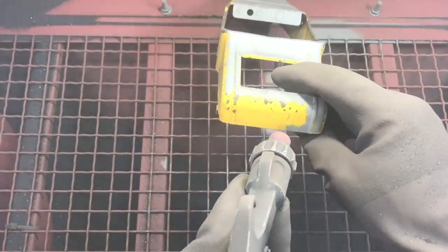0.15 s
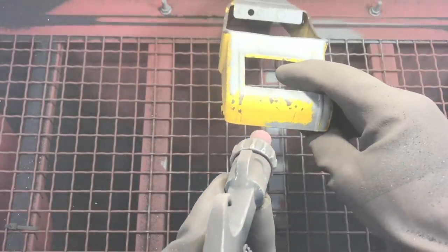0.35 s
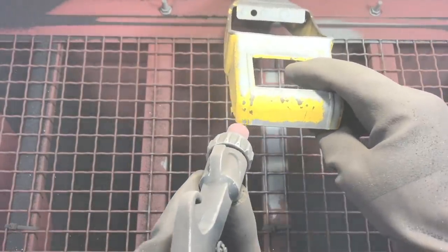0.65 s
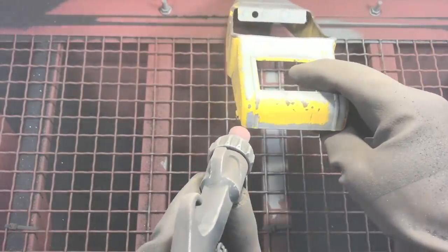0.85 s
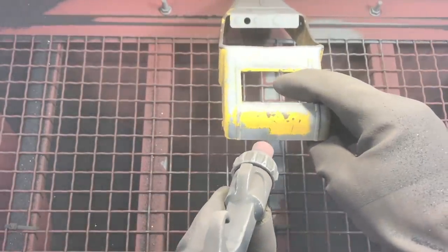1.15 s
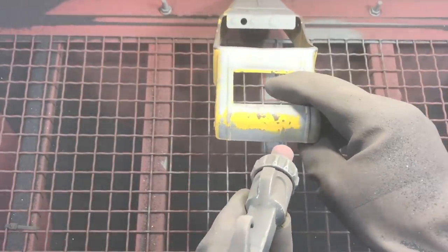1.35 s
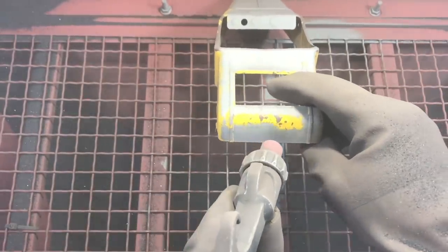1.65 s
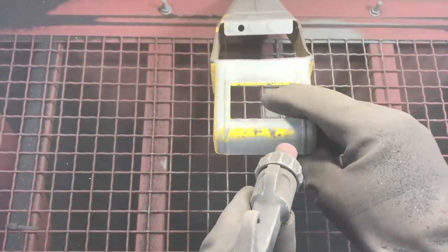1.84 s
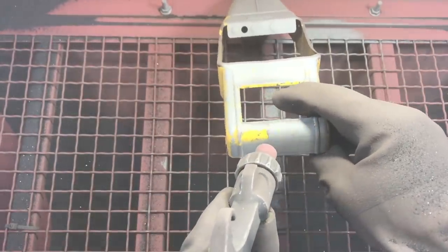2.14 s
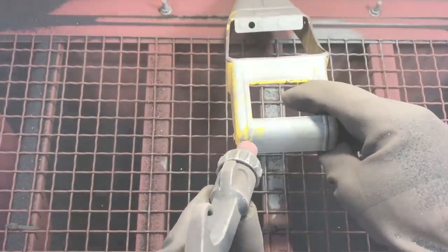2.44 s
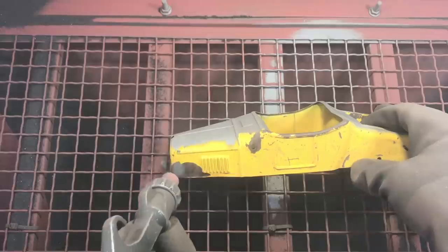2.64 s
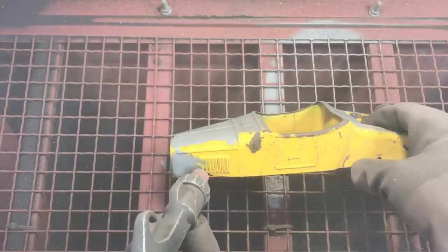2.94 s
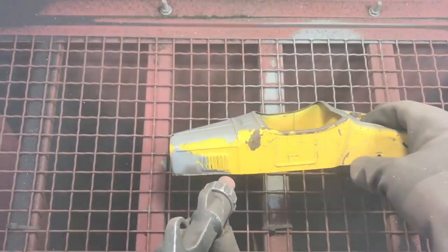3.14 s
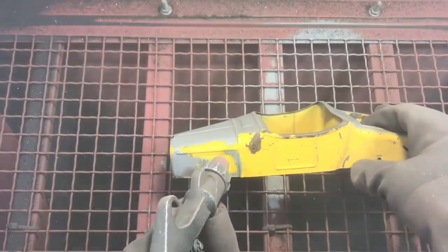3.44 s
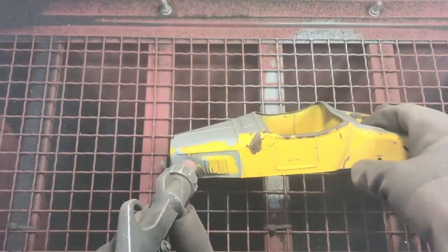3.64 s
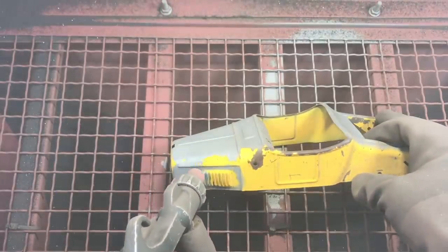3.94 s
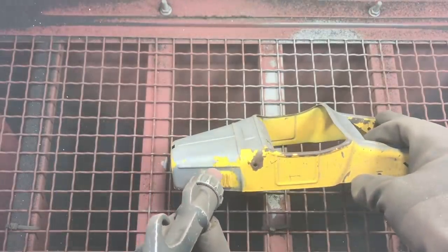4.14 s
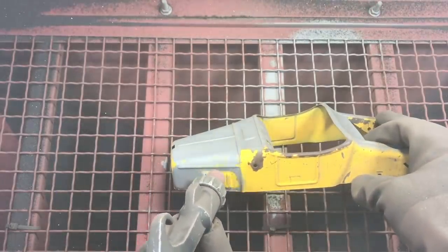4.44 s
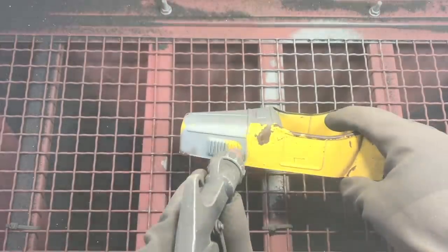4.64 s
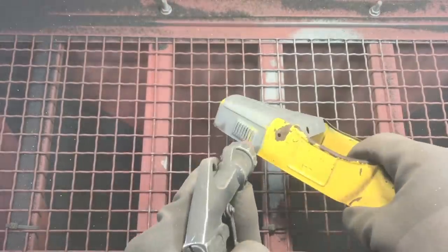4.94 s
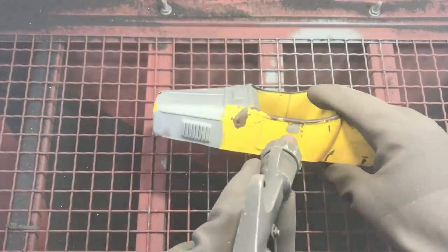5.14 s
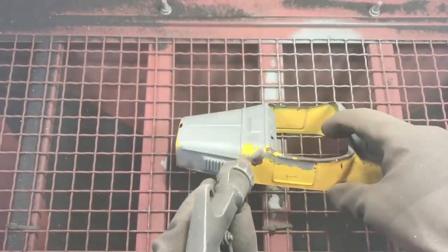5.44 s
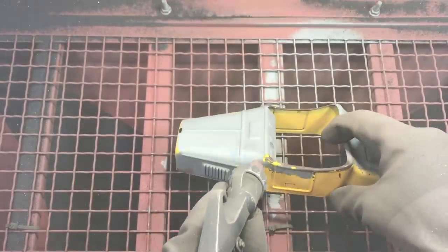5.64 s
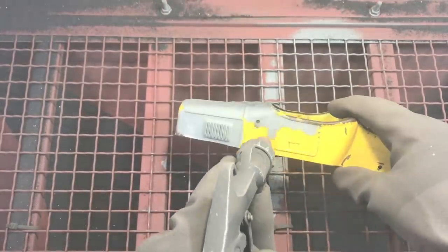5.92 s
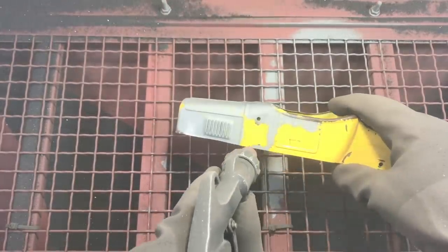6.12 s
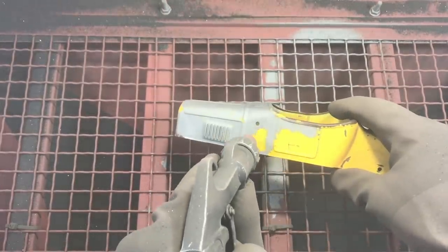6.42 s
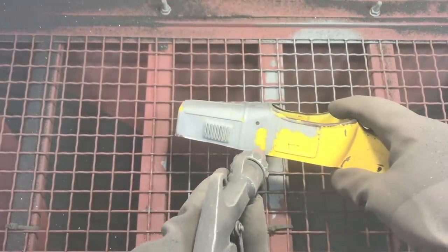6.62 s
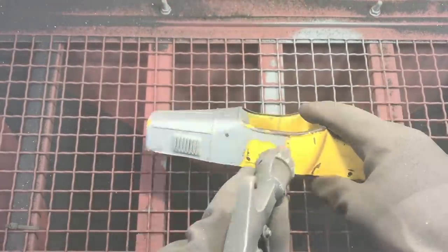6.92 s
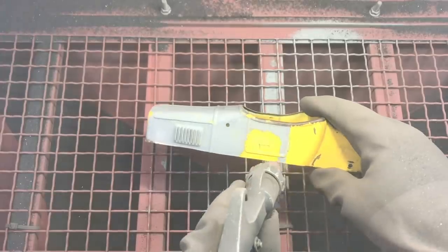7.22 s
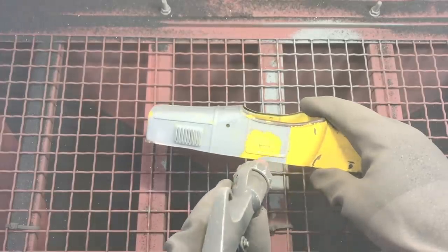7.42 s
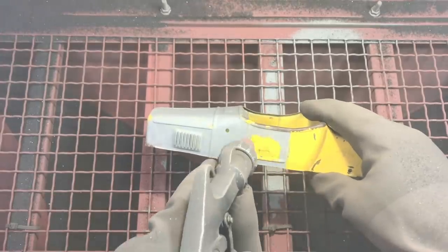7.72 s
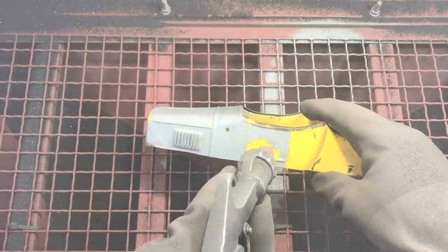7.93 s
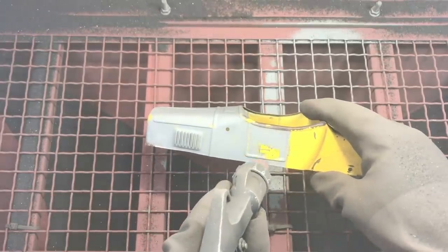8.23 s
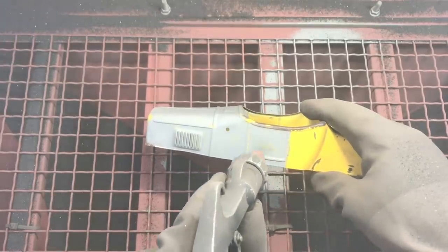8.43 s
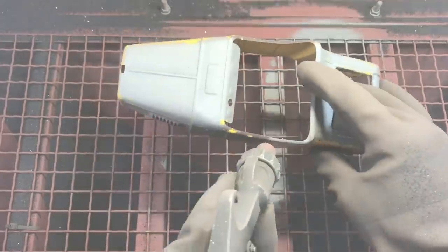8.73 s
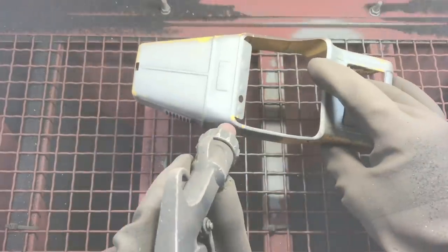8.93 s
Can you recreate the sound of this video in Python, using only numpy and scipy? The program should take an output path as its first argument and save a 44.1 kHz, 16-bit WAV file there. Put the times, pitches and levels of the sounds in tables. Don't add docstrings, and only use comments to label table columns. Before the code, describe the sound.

A blast gun hisses for the whole nine seconds: dense, bright, slightly grainy air noise, strongest in the treble, with a narrower mid-range wash where the jet breaks on thin metal. A faint unsteady whistle near 6.3 kHz is clearest in the first 2.5 seconds, weaker afterwards. Behind it an extractor motor sings quietly in clean, steady harmonics, its pitch dropping very slightly at 4.5. Tiny knocks at 2.15 lead to a sliding scrape at 2.47 and a loud, sharp, bright clack at 2.54-2.58 as one part is dropped. Hiss alone follows until a knock at 4.5, then a rapid cluster of hollow knocks from 4.77 to 5.04, lighter ones at 5.35, a rubbing knock at 5.77 and a firm one at 6.89. Light ticks and rubs come at 8.5-8.7, with a soft low puff at 8.6, and faint touches near 9. Close microphone, small steel box, no deep bass.

```python
import sys
import numpy as np
from scipy import signal
from scipy.fft import rfft, irfft, next_fast_len
from scipy.io import wavfile

SR = 44100
rng = np.random.default_rng(int(sys.argv[2]) if len(sys.argv) > 2 else 0)


def natural_amplitude(level_db):
    exponent = np.asarray(level_db, float) / 20
    return 10 ** exponent


def waveform_to_disk(signal):
    frames = np.transpose(np.atleast_2d(signal))
    scaled = np.clip(frames, -1, 1) * 32767
    samples = np.round(scaled).astype(np.int16)
    wavfile.write(sys.argv[1], SR, samples)


N = 399987

# time in seconds, wash level in dB.
JET_ON_PART = [(0.0, -52.5), (0.48, -51), (0.86, -52), (1.92, -52.5), (2.35, -48.5), (2.85, -52),
               (3.46, -51.5), (4.75, -51), (4.92, -49.5), (8.03, -52), (9.07, -49.5)]
# frequency in Hz, density in dB per Hz.
HISS_SPECTRUM = [(1200, -14.5), (1900, -16), (2300, -13), (3100, -11), (3500, -3), (4500, -4), (5500, -5.5),
                 (7000, -6.5), (8800, -8.5), (9800, -5), (11400, -4.5), (12200, -8.5), (13600, -4.5),
                 (16500, -12)]
# frequency in Hz, density in dB per Hz.
WASH_SPECTRUM = [(400, -24.5), (600, -12.5), (720, -7), (820, 4.5), (950, 5.5), (1200, 3), (1500, -1.5),
                 (2000, -2.5), (2600, -7)]
# frequency in Hz, density in dB per Hz.
RUMBLE_SPECTRUM = [(20, 0.5), (100, 2), (250, 2), (420, 0.5), (600, -1), (900, 0.5)]
# centre in Hz, width in Hz, gain in dB.
CAVITY = [(3650, 200, 3), (3870, 60, -3), (4320, 110, 5), (4850, 120, -7), (6270, 280, 8), (6600, 150, -3),
          (7450, 100, -4), (8400, 80, -3), (2230, 150, -3), (5900, 150, -3), (10140, 150, 8),
          (10300, 120, 9), (10490, 130, -6), (11020, 160, 5), (11290, 90, 3), (11700, 150, -3),
          (13520, 120, 3), (14080, 170, 9), (14560, 100, 3), (15560, 130, 6)]
# delay in seconds, level in dB.
WALL_ECHOES = [(.0021, -21), (.0047, -19), (.0083, -18), (.0131, -18), (.0197, -19)]
# time of the top in seconds, level in dB, half length in seconds.
GUSTS = [(0, -58, 0.12), (.38, -61.5, 0.23), (1.05, -65.5, .3), (1.65, -61.5, 0.34), (2.2, -70, 0.32),
         (3.1, -66, .5), (3.8, -69, .15), (4.562, -62.5, 0.18), (5.3, -65, .3), (5.72, -62, 0.14),
         (6.047, -59, 0.13), (6.623, -62.5, 0.3), (7.418, -61, 0.3), (8.005, -65.5, .3), (8.46, -63, 0.073),
         (8.957, -65, .08)]
POSE_STARTS = [
    0,
    2.56,
    4.5,
]
# level in dB, lift of its top octave in dB.
POSE_HISS = [(-34, 1.7), (-34.4, 2.5), (-34, 1.55)]
# frequency in Hz, level in dB.
WHISTLE = [(6317, -44.3), (6337, -55), (6357, -54)]
# ratio to the whistle, width in Hz, level in dB.
OVERTONES = [(1.697, 22, -55), (2.2, 35, -60)]
# time in seconds, thud in dB, thud in Hz, tick in dB, tick in Hz.
KNOCKS = [(2.155, -40, 958, -37, 1620), (2.164, -43, 930, -38, 3220), (4.493, -21.5, 1020, -35, 1560),
          (4.515, -32, 915, -39, 1810), (4.789, -21, 1040, -26, 1750), (4.7965, -27, 1080, -29, 2070),
          (4.801, -33, 1150, -33, 1600), (4.99, -21, 1020, -25.5, 1750), (5.002, -28, 1140, -41, 1810),
          (5.018, -29, 950, -32, 2200), (5.036, -28, 999, -37, 2270), (5.341, -33, 1080, -35.5, 1760),
          (5.775, -25, 930, -40, 1920), (5.78, -34, 1100, -32, 1750), (5.783, -27, 1070, -36, 1650),
          (5.791, -38, 900, -42, 1550), (6.889, -19.5, 980, -28.5, 1950), (9.061, -36, 980, -38, 1840)]
# time in seconds, thud level in dB, thud frequency in Hz.
TOUCHES = [(2.592, -31.5, 930), (4.771, -25.5, 1050), (4.837, -22.5, 1010), (4.848, -29, 1250),
           (4.88, -33, 940), (4.907, -38, 912), (4.945, -38, 920), (4.966, -26, 1010), (5.04, -34, 1130),
           (5.372, -35, 926), (5.398, -38, 910), (5.757, -28, 1130), (6.876, -26, 990), (8.522, -31, 970),
           (8.712, -37, 920), (8.886, -34, 1250), (8.924, -38, 1270), (8.98, -38, 1230), (9.028, -29, 980)]
# frequency in Hz, level in dB, t60 in seconds.
PART_MODES = [(810, -24, 0.012), (1130, 5, 0.056), (1410, 4, 0.053), (1670, 7.5, 0.036), (2010, 13, 0.013),
              (2330, -6, 0.042), (3200, -8, 0.02), (3960, -1, .015)]
# time of the top in seconds, level in dB, rise in seconds, fall in seconds, centre in Hz.
SCRAPES = [
    (2.468, -33, 0.023, .04, 3840),
    (2.5452, -10.5, 0.0039, 0.0094, 2080),
    (2.5695, -15.5, 0.009, 0.017, 2750),
]
# time of the top in seconds, level in dB, rise in seconds, fall in seconds, centre in Hz.
CRACKS = [
    (2.4838, -21, .0005, 0.011, 2700),
    (2.5437, -10, .0004, 0.007, 5300),
    (2.5660, -15.5, 0.0078, .014, 5600),
    (2.577, -20.5, 0.017, 0.0022, 2850),
]
# time of the top in seconds, level in dB, rise in seconds, fall in seconds, centre in Hz.
THUMPS = [
    (2.5495, -21, .006, .011, 1340),
    (2.5775, -18.5, .04, .003, 1350),
]
# frequency in Hz, width in Hz, level in dB.
SHEET_MODES = [(2070, 180, -4.5), (2760, 280, -7.5), (3840, 570, -0.5), (5700, 590, -0.5),
               (7400, 300, -6.5), (8260, 230, -11), (10100, 320, -14)]
# time of the top in seconds, level in dB, rise in seconds, fall in seconds, centre in Hz.
RUBS = [(.555, -31, .01, .02, 2080), (1.794, -38, .001, .01, 2000), (5.025, -31.5, .05, 0.045, 2000),
        (5.343, -33, .01, 0.033, 1200), (5.757, -25, .001, .01, 1600), (5.79, -26, 0.036, .015, 1280),
        (8.567, -30, .001, .01, 2000), (8.599, -42, .003, 0.019, 500), (8.713, -33, .001, .012, 1600),
        (6.8895, -26, .0006, .008, 3200), (4.9895, -31, .0006, .008, 2600), (8.67, -35.5, .05, .05, 1190)]
# time in seconds, speed in turns per second.
SHAFT = [(0, 456.7), (4.49, 459.3), (4.5, 454.82), (9.07, 457.34)]
# multiple of the shaft rate, level in dB in pose 1, in pose 2, in pose 3.
MOTOR = [(1, -78, -77, -77), (2, -48, -47, -49), (3, -63, -69, -65), (4, -51, -51, -52), (6, -55, -53, -56),
         (7, -57, -56, -60), (8, -68, -58, -58), (9, -61, -69, -61), (10, -57, -58, -57),
         (11, -59, -57, -56), (12, -53, -51, -58), (13, -65, -70, -63), (14, -57, -59, -64),
         (15, -58, -67, -63), (16, -60, -62, -57), (17, -56, -52, -61), (18, -52, -50, -52),
         (20, -60, -56, -60), (24, -55, -56, -62)]
# frequency in Hz, level in dB.
LAMP = [(1917, -61), (3836, -60), (5755, -62)]

HISS_FOLLOWS = 0.098
TOP_RESISTS = 0.7
WASH_OVER_DB, WASH_FOLLOWS_GUSTS = 2.5, 0.056
CALM_DB = -69
BLAST_S, BLAST_DB, BLAST_FALL_S = 8.597, -54.5, .11
WHISTLE_STARTS_LOW_HZ, WHISTLE_SETTLES_S, WHISTLE_WAVER_DB = 22, .3, 1.2
TOUCH_TICK_DB, TOUCH_TICK_HZ = -22, 1730
KNOCK_T60_S = 0.011
BRIGHT_RATIO, BRIGHT_FOLLOWS = 1.48, 0.48
SCRAPE_OCTAVES, RUB_OCTAVES = 1.17, 2.04
SHEET_DB, BETWEEN_DB = 3.0, -3
BASS_CUT_HZ, TOP_CUT_HZ = 610, 15740


def jet():
    (jet_db,), rumble_db = in_time(JET_ON_PART), gusts_db()
    hiss_db, lift_db = np.array(POSE_HISS)[poses()].T
    swing_db = HISS_FOLLOWS * (jet_db - jet_db.mean())
    top_db = lift_db - TOP_RESISTS * swing_db
    wash_db = jet_db + WASH_OVER_DB + WASH_FOLLOWS_GUSTS * (rumble_db - rumble_db.mean())
    hiss_grains = grit(3000, spread_db=3.0, share=0.3)
    hiss = natural_amplitude(hiss_db + swing_db) * air(HISS_SPECTRUM, hiss_grains, top_db, patchy_db=0.72, count=9)
    wash_grains = grit(300, spread_db=3.0, share=0.36)
    wash = natural_amplitude(wash_db) * air(WASH_SPECTRUM, wash_grains, 0, patchy_db=1.5, count=4)
    rumble = natural_amplitude(rumble_db) * air(RUMBLE_SPECTRUM, rng.standard_normal(N), 0, patchy_db=0.5, count=3)
    return hiss + wash + rumble


def gusts_db():
    s = np.arange(N) / SR
    power = natural_amplitude(CALM_DB) ** 2
    power = power + sum(natural_amplitude(db) ** 2 * np.exp(-((s - top) / half) ** 2) for top, db, half in GUSTS)
    power += natural_amplitude(BLAST_DB) ** 2 * (s > BLAST_S) * np.exp(-((s - BLAST_S) / BLAST_FALL_S) ** 2)
    return 10 * np.log10(power)


def air(spectrum, source, top_db, patchy_db, count):
    size = next_fast_len(N)
    hz = np.maximum(np.arange(size // 2 + 1) * SR / size, 10)
    points = np.array(spectrum)
    colour_db = np.interp(np.log(hz), np.log(points[:, 0]), points[:, 1], left=-80, right=-80)
    for centre_hz, width_hz, peak_db in CAVITY:
        colour_db = colour_db + peak_db / (1 + (2 * (hz - centre_hz) / width_hz) ** 2)
    echoes = 1 + sum(natural_amplitude(db) * np.exp(-2j * np.pi * hz * lag) for lag, db in WALL_ECHOES)
    shaped = rfft(source, size) * natural_amplitude(colour_db) * echoes
    place = (count - 1) * np.log(hz / points[0, 0]) / np.log(points[-1, 0] / points[0, 0])
    together, out = drift(16), 0
    for k in range(count):
        share = np.clip(1 - abs(place - k), 0, 1)
        flicker_db = patchy_db * (.4 * together + drift(32))
        lift_db = top_db * (k >= count - 2)
        out = out + irfft(shaped * share, size)[:N] * natural_amplitude(flicker_db + lift_db)
    return rms_one(out)


def grit(per_s, spread_db, share):
    sizes = natural_amplitude(spread_db * np.minimum(rng.exponential(1, N), 5)) * rng.choice([-1, 1], N)
    impacts = sizes * (rng.random(N) < per_s / SR)
    return rng.standard_normal(N) + share * rms_one(impacts)


def nozzle():
    hz, level_db = np.array(WHISTLE)[poses()].T
    early = np.exp(-np.arange(N) / SR / WHISTLE_SETTLES_S)
    hz = hz - WHISTLE_STARTS_LOW_HZ * early
    whistle_db = level_db + 2.0 * early + WHISTLE_WAVER_DB * drift(1.5) + 0.8 * drift(25)
    out = natural_amplitude(whistle_db) * tone(hz + 3.0 * drift(3) + 2.5 * drift(30))
    for ratio, width_hz, over_db in OVERTONES:
        out += natural_amplitude(over_db + 2.5 * drift(25)) * tone(ratio * hz + width_hz * drift(40))
    return out


def knocks():
    out, clicks = np.zeros(N), np.zeros((len(PART_MODES), N))
    fade = np.arange(round(.05 * SR)) / SR
    blows = KNOCKS + [(s, db, hz, db + TOUCH_TICK_DB, TOUCH_TICK_HZ) for s, db, hz in TOUCHES]
    draws = rng.standard_normal((len(blows), len(PART_MODES)))
    for (s, thud_db, thud_hz, tick_db, tick_hz), draw in zip(blows, draws):
        at = round(s * SR) - 30
        bright_db = BRIGHT_FOLLOWS * min(tick_db - thud_db, 0) + 1.5
        tick = pop(tick_hz, 1.03 * KNOCK_T60_S, fade)
        tick = tick + natural_amplitude(bright_db) * pop(BRIGHT_RATIO * tick_hz, .5 * KNOCK_T60_S, fade)
        thud = np.roll(pop(thud_hz, 0.63 * KNOCK_T60_S, fade), 30)
        both = natural_amplitude(thud_db) * thud - natural_amplitude(tick_db - 1.5) * tick
        out[at:at + len(fade)] += both[:N - at]
        clicks[:, at + 20] = natural_amplitude(tick_db - 9 + 2.0 * draw) * np.sign(draw[::-1])
    out += sum(natural_amplitude(db) * ring(row, hz, t60) for row, (hz, db, t60) in zip(clicks, PART_MODES))
    return signal.sosfilt(signal.butter(6, BASS_CUT_HZ, "high", fs=SR, output="sos"), out)


def pop(hz, t60, fade):
    wave = ring(ring(fade == 0, hz, t60), hz, t60)
    return wave / abs(wave).max()


def ring(clicks, hz, t60):
    r, w = natural_amplitude(-60 / (t60 * SR)), 2 * np.pi * hz / SR
    return signal.lfilter([0, np.sin(w)], [1, -2 * r * np.cos(w), r * r], clicks + 1e-18)


def clack():
    contact = scrapes(SCRAPES, SCRAPE_OCTAVES) + scrapes(CRACKS, RUB_OCTAVES)
    rings = sum(natural_amplitude(db) * signal.lfilter(*signal.iirpeak(hz, hz / width_hz, fs=SR), contact + 1e-18)
                for hz, width_hz, db in SHEET_MODES)
    return natural_amplitude(BETWEEN_DB) * contact + natural_amplitude(SHEET_DB) * rings + scrapes(THUMPS, SCRAPE_OCTAVES)


def rubs():
    return scrapes(RUBS, RUB_OCTAVES)


def scrapes(rows, octaves):
    out, lag = np.zeros(N), np.arange(-1500, 1500) / SR
    for s, db, rise, fall, hz in rows:
        shape = natural_amplitude(np.where(lag < 0, 30 * lag / rise, -30 * lag / fall))
        edges_hz = [hz * 2 ** (-octaves / 2), hz * 2 ** (octaves / 2)]
        band = signal.butter(3, edges_hz, "band", fs=SR, output="sos")
        rough = rms_one(signal.sosfilt(band, rng.standard_normal(len(lag))))
        even = signal.sosfilt(band, rough / (abs(signal.hilbert(rough)) + .3))
        at = round(s * SR)
        out[at - 1500:at + 1500] += natural_amplitude(db) * shape * even
    return out


def extractor():
    (shaft,), pose = in_time(SHAFT), poses()
    out = np.zeros(N)
    for order, *levels_db in MOTOR:
        line_db = np.array(levels_db)[pose] + 0.5 * drift(1.6)
        out += natural_amplitude(line_db) * tone(round(order) * shaft)
    for hz, db in LAMP:
        out += natural_amplitude(db) * tone(hz + 1.78 * drift(3.35))
    return out


def tone(hz):
    return np.sqrt(2) * np.sin(2 * np.pi * (np.cumsum(hz) / SR + rng.random()))


def drift(rate):
    r = np.exp(-80 * np.pi * rate / SR)
    slow = signal.lfilter([1], [1, -2 * r, r * r], rng.standard_normal(N // 40 + 2002))[2000:]
    return np.interp(np.arange(N) / 40, np.arange(len(slow)), rms_one(slow))


def poses():
    return np.searchsorted(POSE_STARTS, np.arange(N) / SR, side="right") - 1


def in_time(rows):
    s, *columns = np.transpose(rows)
    return [np.interp(np.arange(N) / SR, s, c) for c in columns]


def rms_one(x):
    return x / np.sqrt(np.mean(x ** 2) + 1e-20)


def scene():
    handling = knocks() + clack() + rubs()
    return np.tile(jet() + nozzle() + extractor() + handling, (2, 1))


def treble_flecks(count, level_db):
    out, window = np.zeros(N), np.sin(np.pi * np.arange(2048) / 2048)
    for place, pitch in rng.random((count, 2)):
        low_hz = 4100 + 10400 * pitch
        band = signal.butter(6, [low_hz, low_hz + 1300], "band", fs=SR, output="sos")
        fleck = rms_one(signal.sosfilt(band, rng.standard_normal(2048)))
        at = int(place * (N - 2048))
        out[at:at + 2048] += natural_amplitude(level_db) * window * fleck
    return out * [[1], [-1]]


def top_cut(x):
    return signal.sosfilt(signal.butter(12, 16310, fs=SR, output="sos"), x)


def record(dry):
    size = next_fast_len(N)
    passed = np.arange(size // 2 + 1) * SR / size < TOP_CUT_HZ
    cut = irfft(rfft(dry, size) * passed, size)[:, :N]
    mix = cut + treble_flecks(count=29, level_db=-48)
    return top_cut(mix)


dry = scene()
out = record(dry)
waveform_to_disk(out)
```